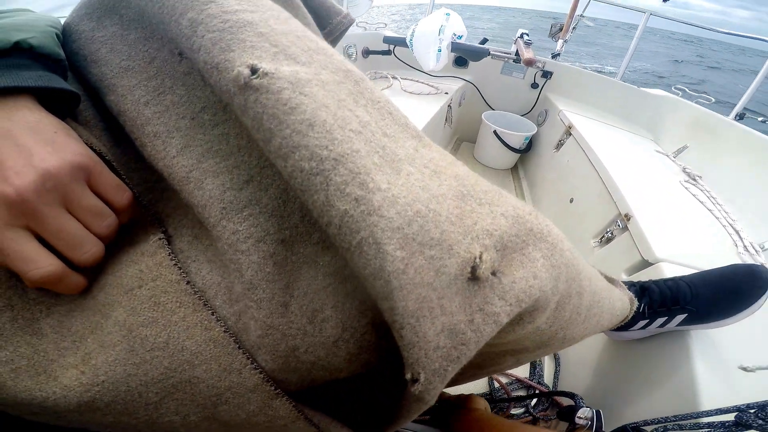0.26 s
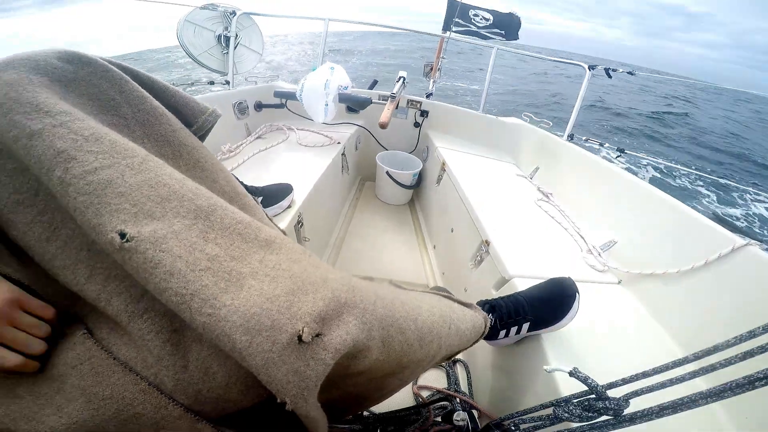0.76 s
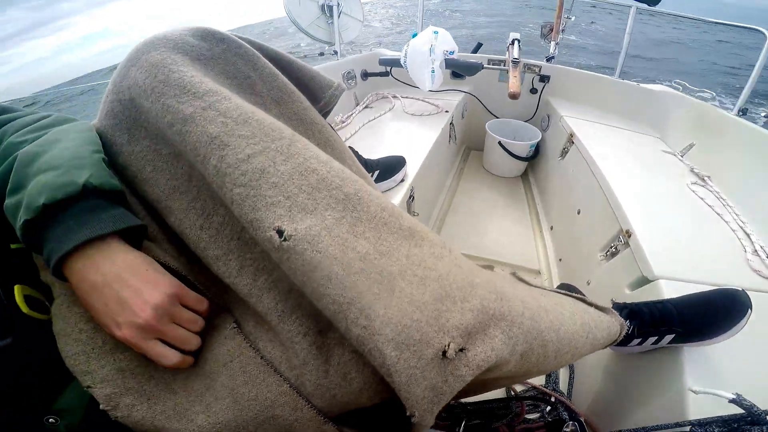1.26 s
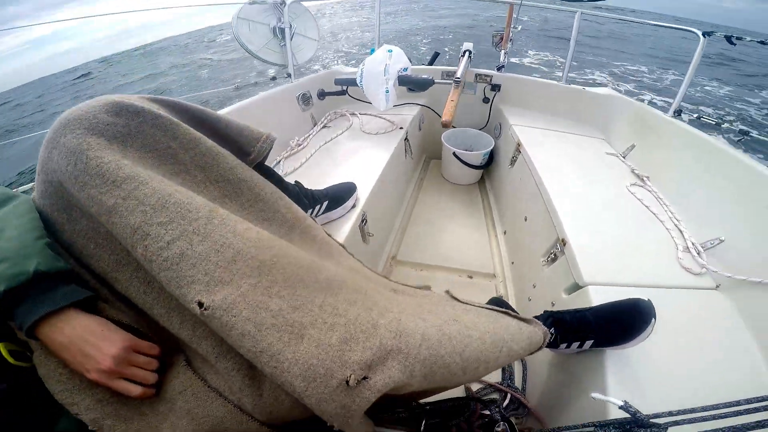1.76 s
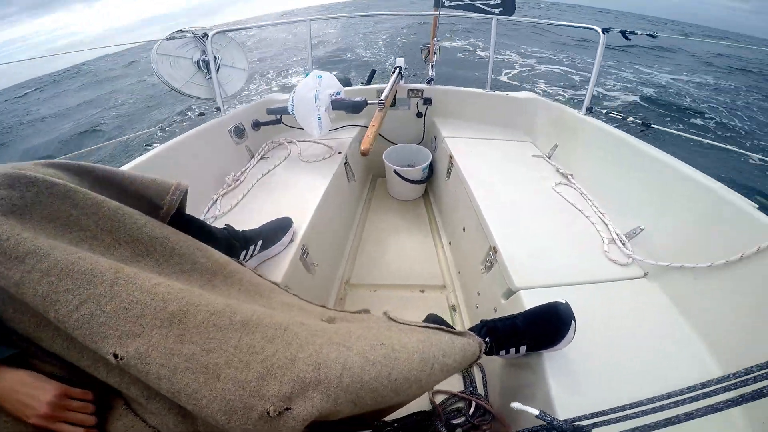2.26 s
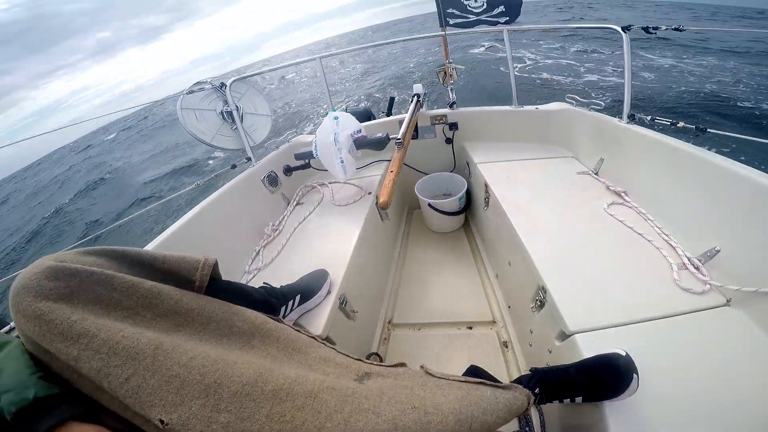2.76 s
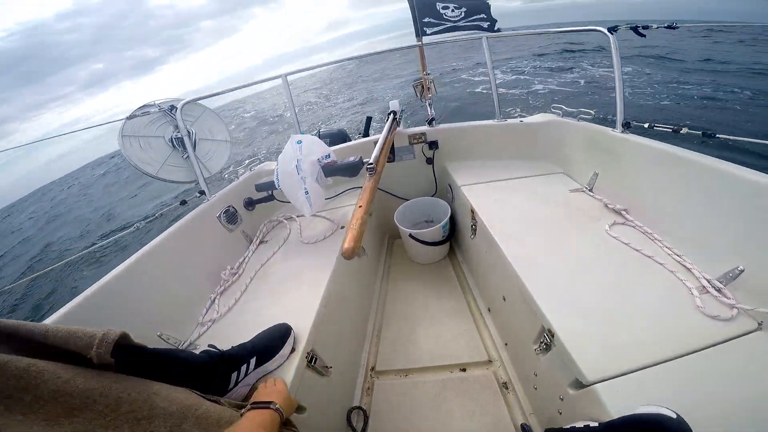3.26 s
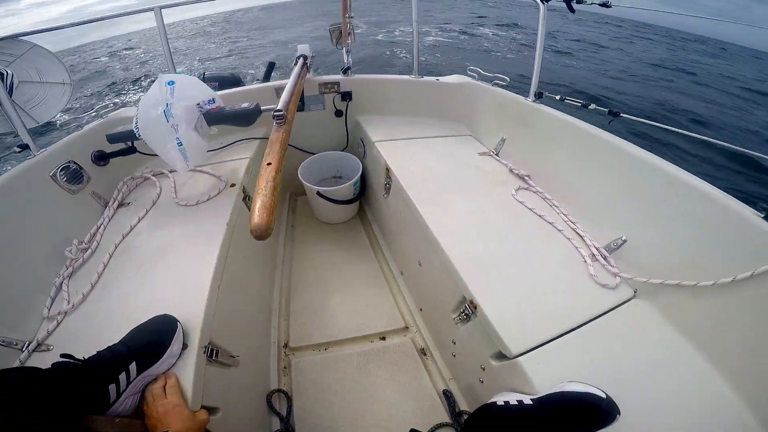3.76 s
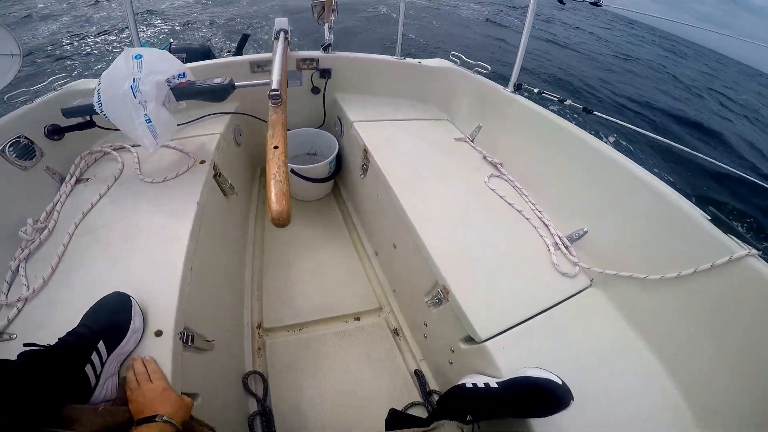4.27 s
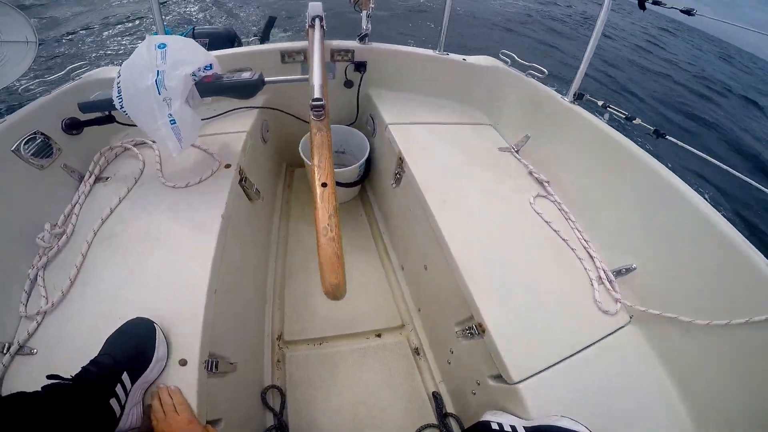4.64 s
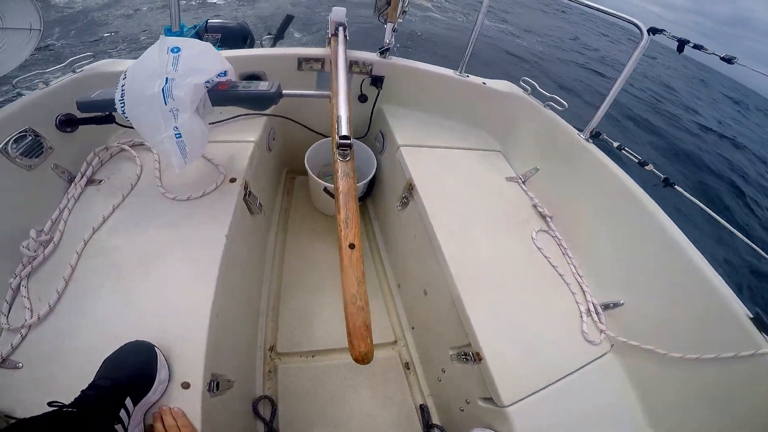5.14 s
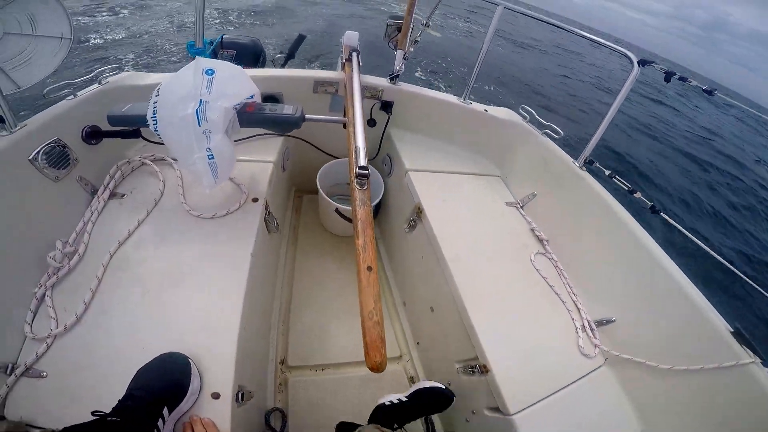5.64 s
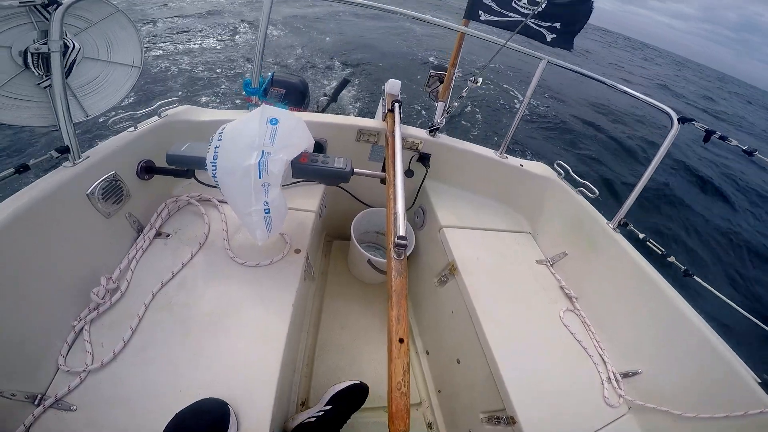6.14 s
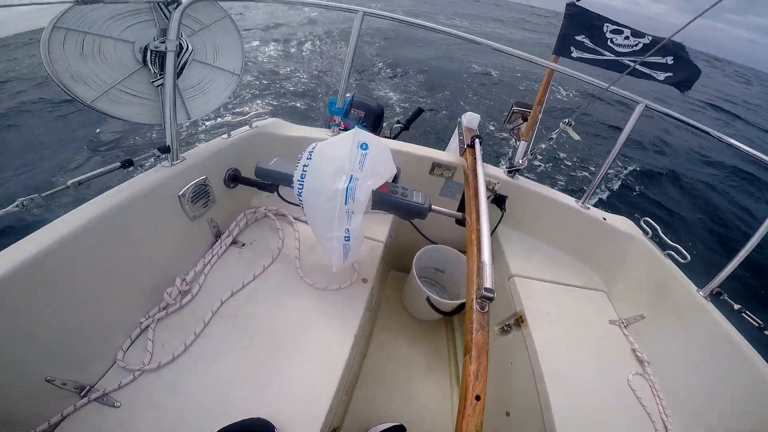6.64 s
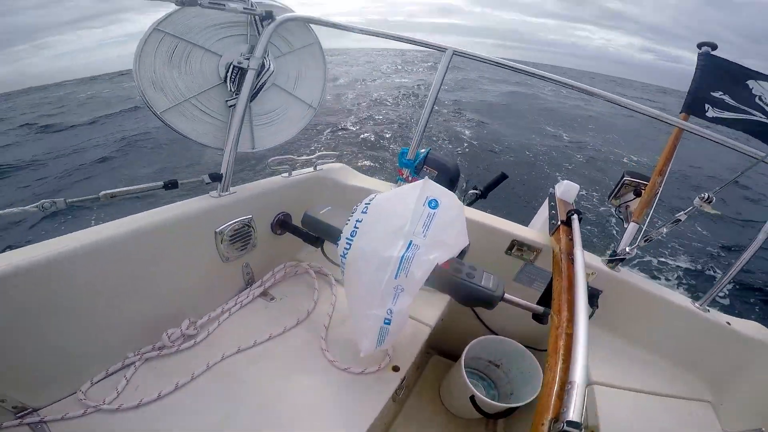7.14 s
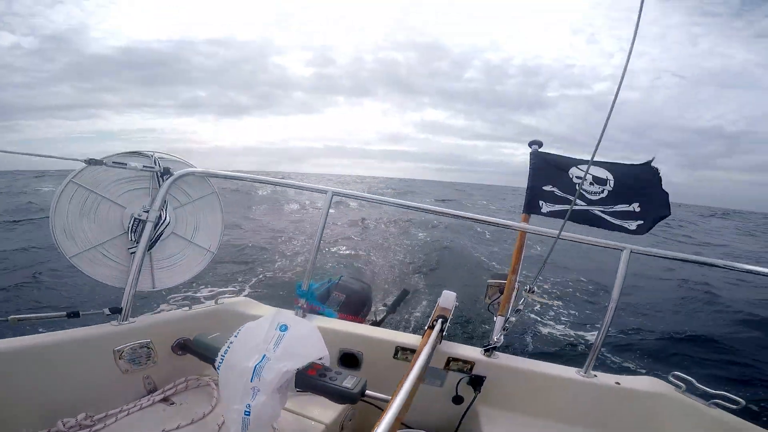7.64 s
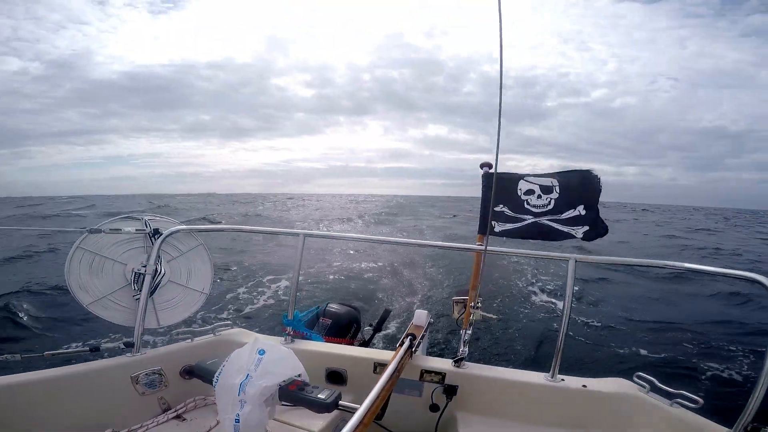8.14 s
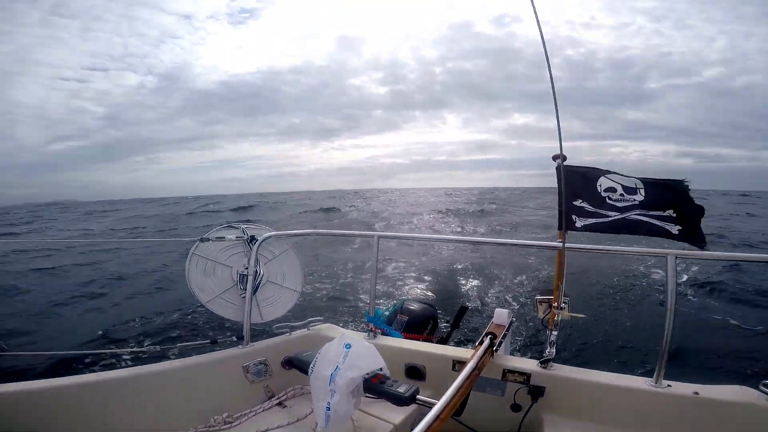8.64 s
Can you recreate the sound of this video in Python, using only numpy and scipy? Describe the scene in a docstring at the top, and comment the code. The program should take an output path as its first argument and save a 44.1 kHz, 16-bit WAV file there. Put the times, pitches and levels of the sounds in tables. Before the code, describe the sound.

Hard clattering knocks on a small sailboat's deck, then ticks, sliding rope, gusty wind on the microphone, washing waves and a groaning, squeaking tiller.

```python
"""Gusts buffet a microphone worn by the sailor in the open cockpit of a small sailboat in a choppy sea.
Wind is flickering coloured noise; waves along the hull are noise, spray clicks and ringing bubbles.
Sheet tackle clacks and drags on the fibreglass deck, ringing its modes; small damped tones are fittings
and the low body of one knock. A line slides in short pulls; the steering gear rubs, groans, squeaks and
chirps as the tiller swings: dense slips ring resonances, and stick-slip tones glide and sag in pitch."""
import sys
import numpy as np
from scipy import signal
from scipy.fft import rfft, irfft
from scipy.io import wavfile
from scipy.ndimage import uniform_filter1d, map_coordinates

SR = 44100
rng = np.random.default_rng(int(sys.argv[2]) if len(sys.argv) > 2 else 0)


def log_audio(samples):
    """Write samples as a 16-bit WAV file to the path given in sys.argv[1]."""
    # one column per channel
    frames = np.atleast_2d(samples).T
    # limit to full scale, then quantise
    limited = np.clip(frames, -1, 1)
    pcm = np.round(limited * 32767).astype(np.int16)
    wavfile.write(sys.argv[1], SR, pcm)


N = 392049


def undb(db):
    """Decibels to gain."""
    return 10 ** (np.asarray(db) / 20)


def unit(x):
    """Scale to rms 1."""
    return x / np.sqrt(np.mean(x ** 2))


def curve(rows):
    """Each column of a table as a control, one value a sample."""
    s, *columns = np.transpose(rows)
    return [np.interp(np.arange(N) / SR, s, c) for c in columns]


def add(out, s, x):
    """Mix x into out from time s."""
    i = max(int(s * SR), 0)
    out[i:i + len(x)] += x[:N - i]


def colour(x, points):
    """Causal minimum-phase filter with the given (Hz, dB) spectrum."""
    hz, db = np.transpose(points)
    size = 8192
    f = np.maximum(np.fft.rfftfreq(size, 1 / SR), 1)
    log_gain = np.log(undb(np.interp(np.log(f), np.log(hz), db)))
    # folding the cepstrum onto positive time makes the filter causal
    cepstrum = irfft(log_gain)
    cepstrum[1:size // 2] *= 2
    cepstrum[size // 2 + 1:] = 0
    impulse = irfft(np.exp(rfft(cepstrum)))
    return signal.fftconvolve(x, impulse)[:len(x)]


def band(x, hz, width):
    """A steep resonance: one band-pass applied twice."""
    b, a = signal.iirpeak(min(hz, SR / 2 - 1), hz / width, fs=SR)
    return signal.lfilter(b, a, signal.lfilter(b, a, x))


def brighten(x, db, hz=4800):
    """Treble shelf."""
    treble = signal.sosfiltfilt(signal.butter(2, hz, "high", fs=SR, output="sos"), x)
    return x + (undb(db) - 1) * treble


def walk(rate, size=N):
    """Random levels held 1 / rate s and slewed twice; spread near 1."""
    k = max(int(SR / rate), 1)
    held = np.repeat(rng.standard_normal(size // k + 1), k)
    return np.sqrt(2) * uniform_filter1d(uniform_filter1d(held, k), k)[:size]


def grains(rate, spread_db, size=N):
    """Random clicks, rate a second on average, most small and a few large."""
    sizes = undb(spread_db * np.minimum(rng.exponential(size=size), 5))
    struck = rng.random(size) < rate / SR
    clicks = struck * sizes * rng.choice([-1, 1], size)
    return unit(clicks + 1e-9 * rng.standard_normal(size))  # the faint noise avoids pure silence


def churn(flicker_db, rate):
    """Noise whose octave bands each flicker on their own."""
    f = np.maximum(np.fft.rfftfreq(N, 1 / SR), 1)
    out = 0
    for octave in np.arange(4, 15):  # centred on 2 ** octave Hz
        weight = np.sqrt(np.maximum(1 - np.abs(np.log2(f) - octave), 0))
        noise = irfft(rfft(rng.standard_normal(N)) * weight, N)
        out = out + noise * undb(flicker_db * walk(rate))
    return unit(out)


def swells(rows, rise_share, roundness, rest_db=-120):
    """Gain of overlapping (peak s, dB, length s) swells: each builds and dies away, and their powers sum."""
    power = np.full(N, undb(rest_db) ** 2)
    share = np.clip(rise_share, .1, .9)
    for s, db, length in rows:
        t = np.arange(N) / SR - s
        away = np.abs(t) / (length * np.where(t < 0, share, 1 - share))
        gain = undb(db) * np.exp(-np.minimum(away ** roundness, 20))
        power = power + gain ** 2
    return np.sqrt(power)


def scrape(body, size=N):
    """Dense tiny slips, at many points of contact, ring a set of (Hz, width Hz, dB) resonances."""
    out = 0
    for hz, width, db in body:
        slips = grains(rate=5000, spread_db=2.0, size=size)
        out = out + undb(db) * band(slips, hz, width)
    return unit(out)


def bend(x, speed):
    """Move all pitches of x by a changing factor."""
    return map_coordinates(x, [np.cumsum(speed)], order=3, mode="wrap")


# Wind spectrum. Each row: frequency in Hz, level in dB per Hz.
WIND_COLOUR = [(20, -17), (42, 0.5), (85, -1.5), (160, -6), (300, -16.5), (600, -29), (3000, -26.5),
               (5000, -39.5), (15000, -50.5)]
# The breeze between gusts, which freshens as the sailor sits up. Each row: time in seconds, level in dB.
BREEZE = [(0, -52), (2.9, -52), (3.3, -41), (5.2, -45), (5.5, -43), (6.15, -47.5), (7.4, -40.5),
          (8.89, -45.5)]
# Gusts on the microphone. Each row: peak in seconds, level in dB, length in seconds.
GUSTS = [(.47, -36.5, 0.24), (.92, -39, 0.17), (1.57, -40.5, 0.2), (1.91, -32.5, 0.26), (2.25, -41, 0.71),
         (3.42, -27, 0.13), (3.66, -25, 0.34), (3.95, -31, 0.28), (4.54, -30, 0.23), (5.65, -27.5, 0.1),
         (5.87, -36, 0.17), (6.24, -33, 0.071), (6.77, -30, 0.14), (7.12, -36, 0.35), (7.72, -29, 0.2),
         (8.0, -32.5, 0.17)]
GUST_RISE_SHARE, GUST_ROUNDNESS = 0.36, 1.35  # part of the length spent building; 1 = pointed, 2 = bell-shaped
# Sudden buffets. Each row: peak in seconds, peak level in dB, pitch in Hz, length scale in seconds.
BUFFETS = [(0.89, -15.5, 60, 0.016), (1.919, -18, 70, 0.013), (3.392, -16, 156, 0.0088),
           (3.958, -17.5, 97, 0.011), (5.851, -15.5, 111, 0.0091), (6.221, -23.5, 96, 0.019),
           (7.7, -19.5, 87.4, 0.032)]


def wind():
    """Eddies rumble on the microphone; a buffet is a few swings of pressure with a puff of hiss."""
    breeze_db, = curve(BREEZE)
    strength = np.hypot(undb(breeze_db), swells(GUSTS, GUST_RISE_SHARE, GUST_ROUNDNESS))
    eddies = colour(churn(flicker_db=2.5, rate=28), WIND_COLOUR)
    out = unit(eddies * undb(2.0 * walk(35))) * strength
    t = np.arange(-SR // 10, SR // 5) / SR  # seconds from the peak
    for s, db, hz, length in BUFFETS:
        swell = np.exp(-(t / np.where(t < 0, 0.31 * length, 1.1 * length)) ** 2)
        swing = swell * np.cos(2 * np.pi * hz * t)
        puff = np.exp(-(t / np.where(t < 0, .006, .05)) ** 2)
        hiss = unit(colour(rng.standard_normal(len(t)), WIND_COLOUR[4:]))  # without the low rumble
        add(out, s + t[0], undb(db) * (swing + undb(-20.0) * puff * hiss))
    return out


def bubbles(count, low_hz, high_hz, cycles):
    """Small bubbles ring for some cycles, rising in pitch as they surface."""
    out = np.zeros(N)
    for when, pitch, size in rng.random((count, 3)):
        hz = low_hz * (high_hz / low_hz) ** pitch
        age = np.linspace(0, 1, int(cycles * SR / hz))
        ring = np.sin(2 * np.pi * cycles * age * (1 + 0.065 * age)) * undb(-45 * age)
        add(out, when * N / SR, ring * undb(17 * size ** 3))  # a few stand out
    return unit(out)


# Spectrum of washing water, shared by the cockpit echo. Each row: frequency in Hz, level in dB per Hz.
WASH_COLOUR = [(150, -4), (500, -0.5), (1000, 2.5), (2400, 4.5), (3800, -3), (4800, -11.5), (15000, -32)]
# Spectrum of the wake's hiss. Each row: frequency in Hz, level in dB per Hz.
SEA_COLOUR = [(40, 6), (300, -10), (1300, -14), (2600, -6.5), (3900, -5.5), (4700, -13.5), (6800, -18),
              (8500, -21), (15000, -24)]
# Waves washing along the hull. Each row: crest in seconds, level in dB, length in seconds.
WAVES = [(.5, -39.5, 0.22), (.75, -50, 0.097), (1.53, -45, 0.14), (1.78, -43, 0.06), (1.98, -41.5, 0.13),
         (2.17, -43.5, 0.33), (2.55, -43.5, 0.34), (3.42, -40, 0.43), (3.66, -34, 0.14), (4.02, -47, 0.69),
         (5.6, -49.5, 1), (6.28, -46.5, 0.12), (6.8, -44.5, 0.6), (7.18, -36, 0.17), (7.35, -39.5, 0.032),
         (7.73, -43.5, 0.25), (8.04, -43, 0.34), (8.4, -49.5, 0.91)]
WAVE_RISE_SHARE, WAVE_ROUNDNESS = 0.55, 1.48
RIPPLE_DB = -58.5  # the wash between waves


def water():
    """Waves swell along the hull with spray and bubbles, over the steady hiss of the wake."""
    surge = swells(WAVES, WAVE_RISE_SHARE, WAVE_ROUNDNESS, rest_db=RIPPLE_DB)
    foam = churn(flicker_db=3.0, rate=54) + undb(-6.0) * grains(rate=1600, spread_db=8.0)
    ringing = bubbles(count=3000, low_hz=716, high_hz=4000, cycles=34.0)
    wash = unit(colour(foam, WASH_COLOUR)) + undb(-8.0) * ringing
    fizz = churn(flicker_db=3.0, rate=38) + undb(-5.0) * grains(rate=1500, spread_db=4.0)
    wake = unit(colour(fizz, SEA_COLOUR))
    return wash * surge + undb(-52.0) * wake


# Modes of tackle and deck. Each row: frequency in Hz, level in dB.
DECK_MODES = [(500, -7.5), (590, -2), (855, 3), (955, -2), (1322, -7), (1935, 5), (2177, -4), (2540, 5.5),
              (3060, 5.5), (3297, 6), (3505, 6.5), (3800, 6.5), (4260, 1), (5500, 0), (6600, -2.5),
              (6950, -1), (9500, -6), (13400, -5)]
DECK_T60_S, DECK_DAMP_HZ = 0.091, 2570  # ring time towards 0 Hz; pitch at which it has halved


def deck_ring(t):
    """The deck's answer to a single contact, a little different at each spot; high modes die sooner."""
    ring = 0
    for (hz, db), detune in zip(DECK_MODES, rng.standard_normal(len(DECK_MODES))):
        t60 = DECK_T60_S / (1 + hz / DECK_DAMP_HZ)
        cycles = hz * (1 + 0.0041 * detune) * t + rng.random()
        ring = ring + undb(db - 60 * t / t60) * np.sin(2 * np.pi * cycles)
    return ring


# Tackle striking the deck. Each row: start in seconds, attack level in dB before the treble shelf,
# treble shelf in dB, rattle decay in seconds.
CLACKS = [(0.125, -38.5, 3, 0.0034), (0.2029, -18.5, 3, 0.0058), (0.205, -15, -5, 0.0065),
          (0.219, -12.5, 7, 0.0077), (0.228, -11.5, 0.5, 0.0061), (0.237, -13.5, -8, 0.0028),
          (0.399, -18.5, 0, 0.0058), (0.406, -14.5, -3, 0.012), (0.511, -35.5, 20, 0.0064),
          (0.521, -26, -10, 0.0068), (3.396, -27, -34, 0.017), (4.126, -31, -7, 0.0035),
          (4.132, -25.5, -16, 0.0017), (4.696, -33, -21, 0.0037), (5.629, -22.5, -1, 0.0095),
          (5.635, -23, 1.5, 0.0035), (5.85, -34, -18, 0.022), (7.707, -29.5, -2, 0.02),
          (7.785, -34.5, -9, 0.0022)]
# Spectrum of a blow's crack. Each row: frequency in Hz, level in dB per Hz.
CLACK_COLOUR = [(150, -12), (700, -12.5), (1400, -8), (2100, 2.5), (3700, -6.5), (4900, -10), (6800, -14.5),
                (8200, -18), (15000, -28.5)]
# Tackle dragging across the deck. Each row: peak in seconds, level in dB, length in seconds.
DRAGS = [(.378, -41, 0.026), (.465, -36.5, 0.13)]


def tackle():
    """Each blow is a rattle of contacts that rings fitting and deck, with a cockpit echo; between, it drags."""
    out, t = np.zeros(N), np.arange(SR // 2) / SR
    for s, db, treble_db, rattle in CLACKS:
        fade = np.exp(-t / rattle)
        contacts = grains(rate=2100, spread_db=0.5, size=len(t)) * fade
        ring = signal.fftconvolve(contacts, deck_ring(t))[:len(t)]
        crack = colour(rng.standard_normal(len(t)) * fade, CLACK_COLOUR)
        echo = colour(rng.standard_normal(len(t)) * undb(-60 * t / 0.25), WASH_COLOUR)
        blow = undb(2) * unit(ring) + unit(crack) + undb(-8.5) * unit(echo)
        attack_rms = np.std(blow[:SR // 100])  # over the first 10 ms
        add(out, s, undb(db) * brighten(blow / attack_rms, treble_db))
    bumps = colour(grains(rate=970, spread_db=2.5), WASH_COLOUR)
    bumped_deck = signal.fftconvolve(bumps, deck_ring(t))[:N]
    drag = unit(unit(bumps) + unit(bumped_deck))
    return out + drag * swells(DRAGS, rise_share=0.57, roundness=3.0)


# Small fittings ticking, and the low body of one knock (870 Hz).
# Each row: start in seconds, level in dB, pitch in Hz.
FITTING_RINGS = [(0.94, -32, 7300), (1.049, -34.5, 5570), (2.183, -26.5, 3470), (2.183, -36.5, 6860),
                 (2.299, -23, 2960), (2.489, -12.5, 3100), (2.53, -21.5, 3240), (2.607, -23, 3280),
                 (4.149, -27, 3250), (4.195, -28.5, 3200), (4.212, -33, 2600), (4.29, -42, 5800),
                 (4.667, -20, 3330), (4.695, -21.5, 2930), (4.975, -32.5, 5800), (5.631, -13.5, 870),
                 (6.538, -35, 6450), (6.564, -26.5, 6370), (7.708, -14.5, 3140)]


def fittings(t60=0.028):
    """Ticks and the low body of one knock: a brief contact, then a damped ring and a burst around its pitch."""
    out, t = np.zeros(N), np.arange(SR // 8) / SR
    for s, db, hz in FITTING_RINGS:
        burst = unit(band(rng.standard_normal(len(t)), hz, 0.4 * hz))
        contact = np.exp(-t * hz / np.pi)  # lasts a few cycles
        rise = np.minimum(t * hz / 2, 1)  # over two cycles
        tone = (0.1 + contact) * np.sin(2 * np.pi * hz * t)
        add(out, s, rise * undb(db - 60 * t / t60) * (tone + 0.66 * burst))
    return out


# The line sliding. Each row: start in seconds, end in seconds, starting level in dB,
# grip in dB (the fitting's singing against the slide).
PULLS = [(2.299, 2.386, -37, 4.5), (2.486, 2.571, -34, 3.5), (2.614, 2.668, -32.5, 1.5),
         (2.648, 2.75, -38.5, -11), (2.722, 3.324, -41.5, -21)]
# Resonances of the sliding line. Each row: frequency in Hz, width in Hz, level in dB.
LINE_BODY = [(2665, 280, -0.5), (3480, 1060, -10.5), (6120, 930, -10), (7040, 950, -10)]


def line():
    """Braided rope slides over a fitting and slows in each pull; a hard grip makes the fitting sing."""
    out = np.zeros(N)
    for start, end, db, grip_db in PULLS:
        size = max(int((end - start) * SR), SR // 50)
        singing = scrape([(3300, 400, 0)], size)
        slide = unit(scrape(LINE_BODY, size) + undb(grip_db) * singing)
        slide = bend(slide, 1 + .013 * walk(30.1, size))  # the tension wavers
        slowing_db = -32 * (np.arange(size) / SR) ** 2
        level = undb(db + slowing_db + 0.48 * walk(223, size))
        add(out, start, slide * signal.windows.tukey(size, .15) * level)
    return out


SQUEAK_BODY_HZ, SQUEAK_BODY_WIDTH_HZ = 3800, 430  # the resonance that picks out their octave
STUTTER_HZ = 42.3  # how often a squeak loses its grip, on average


def squeak(length, start_hz, end_hz, db, harshness):
    """A gliding stick-slip tone stutters as it loses grip; its raspy octave flares near a gear resonance."""
    size = int(length * SR)
    waver = .015 * walk(130, size)
    hz = np.linspace(start_hz, end_hz, size) * (1 + waver)
    phase = 2 * np.pi * np.cumsum(hz) / SR + .7 * harshness * walk(700, size)
    tone, rasp = (np.sin(order * phase) * undb(3 * order * walk(170, size)) for order in (1, 2))
    octave = band(unit(rasp), SQUEAK_BODY_HZ, SQUEAK_BODY_WIDTH_HZ)
    stutter = np.sin(np.pi * STUTTER_HZ * np.arange(size) / SR + .5 * walk(STUTTER_HZ, size))
    grip = np.sqrt(np.abs(stutter))
    voice = unit(tone) + harshness * octave
    return undb(db) * unit(voice * grip * signal.windows.tukey(size, .1))


# Strokes of the steering gear. Each row: peak in seconds, level in dB, length in seconds,
# edge in dB against that level.
STROKES = [(3.75, -37.5, 0.073, -4), (4.184, -48, 1, -3.5), (5.753, -46.5, 1, -7),
           (6.386, -41.5, 0.38, -12.5), (6.667, -31.5, 0.18, -1.5)]
STROKE_RISE_SHARE, STROKE_ROUNDNESS = 0.39, 1
# The tiller comes under full load. Each row: peak in seconds, level in dB, length in seconds.
GROANS = [(6.68, -35.5, 0.096), (6.772, -30.5, 0.097)]
GROAN_HZ, GROAN_TONE_DB = 952, -1  # resting pitch of the note sung under load; its level against the scraping
# Resonances of the gear: the low ones speak only under load, the edge when it runs dry.
# Each row: frequency in Hz, width in Hz, level in dB.
RUB_LOW = [(948, 130, 4.5), (1476, 190, 2), (1850, 200, 2.5)]
RUB_MIDDLE = [(1870, 300, -5.5), (2676, 530, -0.5)]
RUB_EDGE = [(3690, 540, 3), (7020, 1000, -14)]
# Squeaks. Each row: start in seconds, length in seconds, start pitch in Hz, end pitch in Hz,
# level in dB, harshness from 0 to 1.
SQUEAKS = [(3.726, 0.082, 2040, 1976, -35, 1), (8.034, 0.052, 1940, 2060, -39, 0.8),
           (8.086, 0.064, 2600, 2260, -43, 0.8), (8.15, 0.1, 2190, 1940, -41, 0.7)]
# the fastest swing: time, length scale, share by which the pitch rises
SWING_S, SWING_LENGTH_S, SWING_RISE = 6.57, 0.18, .075


def steering():
    """The gear scrapes in each stroke, rises in pitch as it swings, groans at full load and sometimes squeaks."""
    from_swing = (np.arange(N) / SR - SWING_S) / SWING_LENGTH_S
    stretch = 1 + SWING_RISE * np.exp(-from_swing ** 2)
    rubs = [(s, db, length) for s, db, length, _ in STROKES]
    edges = [(s, db + edge_db, length) for s, db, length, edge_db in STROKES]
    effort = swells(rubs, STROKE_RISE_SHARE, STROKE_ROUNDNESS)
    dryness = swells(edges, STROKE_RISE_SHARE, STROKE_ROUNDNESS)
    load = swells(GROANS, rise_share=0.72, roundness=1.05)
    middle, low = (bend(scrape(body), stretch) for body in (RUB_MIDDLE, RUB_LOW))
    note = np.sin(2 * np.pi * np.cumsum(GROAN_HZ * stretch) / SR + .85 * walk(170))
    groan = unit(low + undb(GROAN_TONE_DB) * unit(note))
    grip_db = 1.5 * walk(90)
    out = undb(grip_db) * (effort * middle + dryness * scrape(RUB_EDGE) + load * groan)
    for s, *row in SQUEAKS:
        add(out, s, squeak(*row))
    return out


# The turning gear catches with a brief chirp. Each row: start in seconds, pitch in Hz, level in dB.
CATCHES = [(3.731, 6520, -44.5), (5.445, 2080, -44), (5.547, 2680, -41), (5.668, 2400, -38.5),
           (5.728, 2530, -39), (5.844, 2580, -33.5), (5.892, 2580, -29.5), (5.902, 2180, -40.5),
           (5.951, 2700, -38), (6.037, 2524, -42.5), (6.151, 2500, -44)]
CATCH_S, CATCH_SAG = 0.024, 0.064  # length of a chirp; share by which its pitch starts high and ends low
TWITTER_S = (5.47, 6.12)  # span over which fainter catches are scattered
TWITTER_HZ, TWITTER_DB = (2060, 2730), -47  # their pitch range and level


def chatter(count=18):
    """Each catch of the gear is a slightly rough chirp that sags in pitch; fainter ones come at random."""
    out, size = np.zeros(N), int(CATCH_S * SR)
    faint = []
    for s in np.linspace(*TWITTER_S, count):
        start = s + CATCH_S * rng.uniform(-0.91, 1)
        faint.append((start, rng.uniform(*TWITTER_HZ), TWITTER_DB))
    sag = 1 + CATCH_SAG * np.linspace(1, -1, size)
    for s, hz, db in list(CATCHES) + faint:
        phase = 2 * np.pi * np.cumsum(hz * sag) / SR
        chirp = np.sin(phase + .75 * walk(520, size)) * np.hanning(size)
        add(out, s, undb(db) * unit(chirp))
    return out


def scene():
    """Everything at the one microphone."""
    return (wind() + water() + tackle() + fittings() + line() + steering() + chatter())[None]


RUMBLE_CUT_HZ, TOP_HZ = 32.3, 15500


def record(dry):
    """The microphone sheds the deepest rumble, clips peaks beyond full scale and cuts the top."""
    rumble_cut = signal.butter(3, RUMBLE_CUT_HZ, "high", fs=SR, output="sos")
    lean = signal.sosfiltfilt(rumble_cut, dry)
    top_cut = signal.ellip(10, .2, 95, TOP_HZ, fs=SR, output="sos")
    return signal.sosfilt(top_cut, np.clip(lean, -1, 1))


dry = scene()
out = record(dry)
log_audio(out)
```